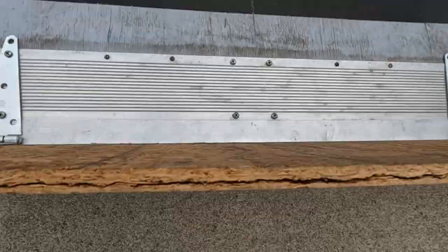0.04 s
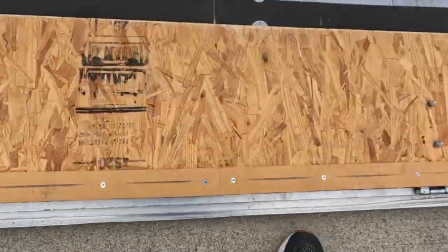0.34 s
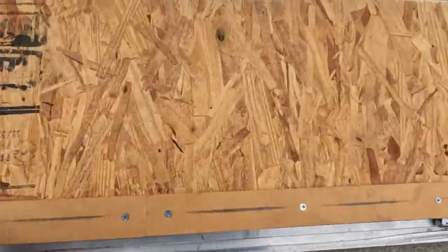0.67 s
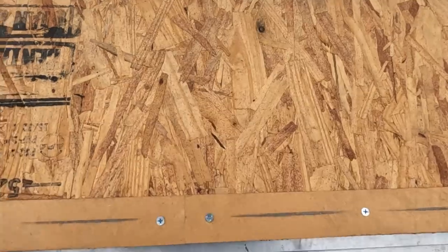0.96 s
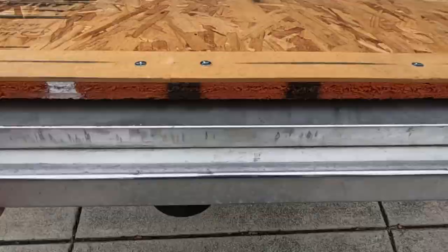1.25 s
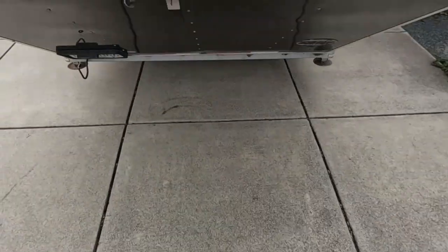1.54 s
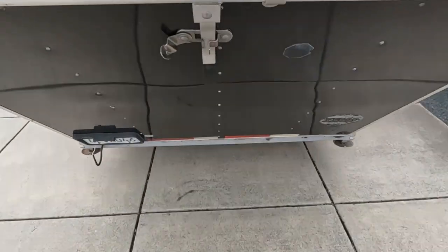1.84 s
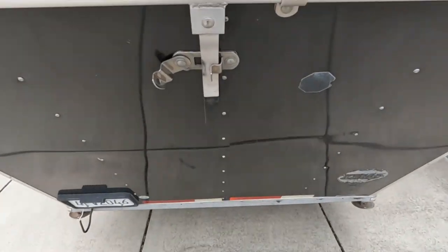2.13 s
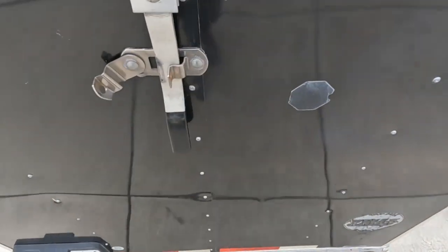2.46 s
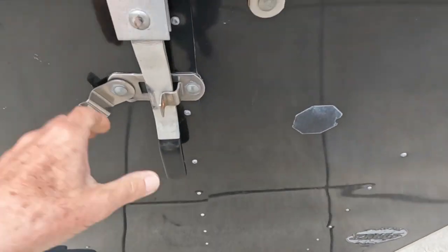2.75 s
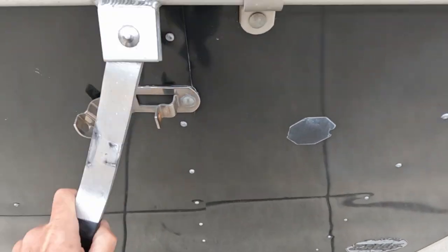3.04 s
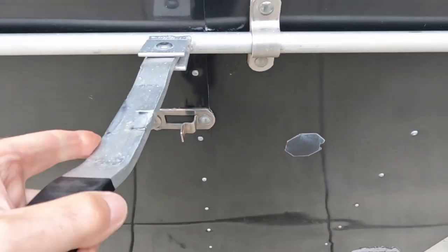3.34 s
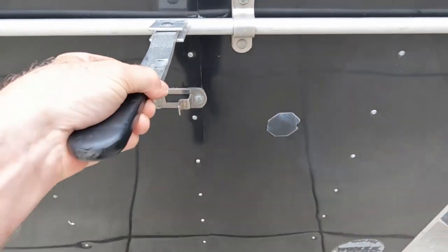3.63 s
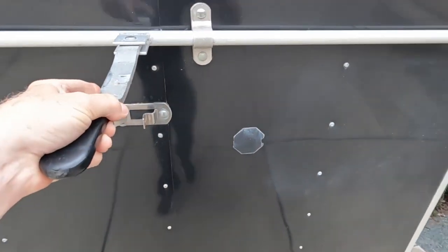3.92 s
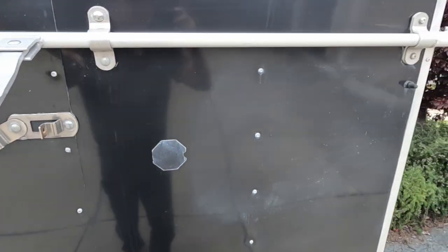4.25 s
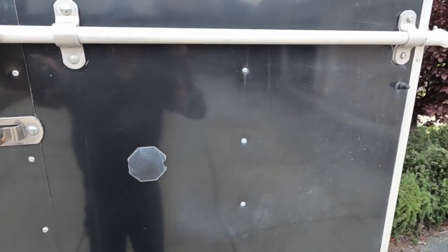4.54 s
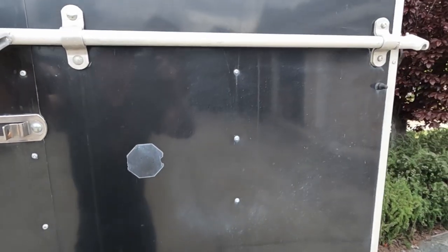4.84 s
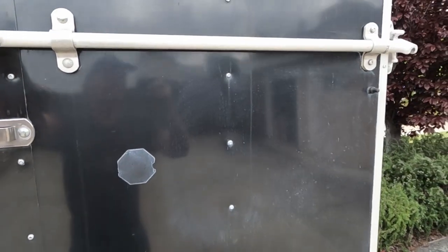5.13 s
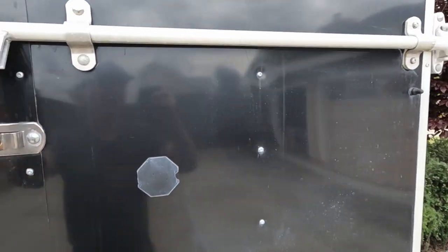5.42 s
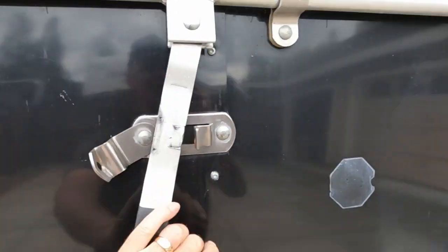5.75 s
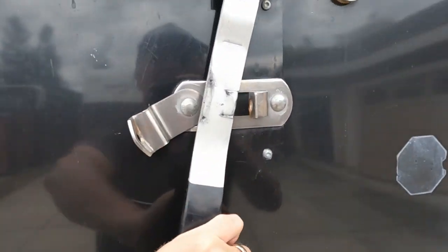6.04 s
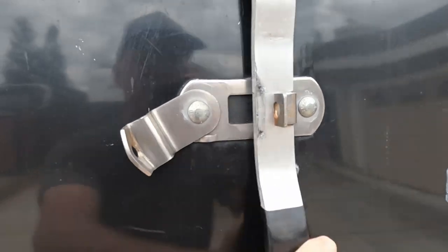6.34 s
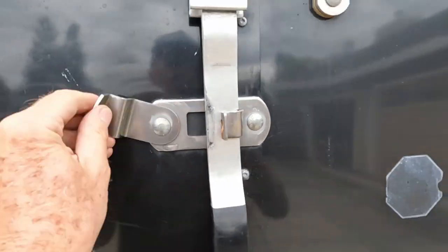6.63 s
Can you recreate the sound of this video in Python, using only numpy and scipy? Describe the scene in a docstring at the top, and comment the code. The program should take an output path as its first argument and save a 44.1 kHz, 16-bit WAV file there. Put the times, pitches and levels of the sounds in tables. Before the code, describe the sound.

A plywood flap slams over on a cargo trailer's ramp. The ramp is lifted with a gritty rattle and a whirring spring, then thuds against the frame. A steel handle scrapes and clanks out of its hasp, the locking bar knocks and groans briefly, and the latch closes with sharp clicks. It is heard up close outdoors, with a light breeze and a faint engine hum.

```python
"""The plywood ramp door of a cargo trailer is closed on a concrete driveway, heard from arm's length.
Over a light breeze and a far engine, its flap slams over (0.3 s). The ramp is heaved up (1.2 s) with a
rattle and a whirr of its spring, and booms on the frame (2.3 s). A steel handle grinds out of its hasp
(3.1 s), turns the locking bar, forces the groaning cams home (5.3 s) and is latched (6.3 s).
Shoes and fittings scuff along the way."""
import sys
import numpy as np
from scipy import signal
from scipy.fft import rfft, irfft, next_fast_len
from scipy.io import wavfile
from scipy.ndimage import uniform_filter1d

SR = 44100
rng = np.random.default_rng(int(sys.argv[2]) if len(sys.argv) > 2 else 0)


def unload_audio(sound):
    """Save the sound as a 16-bit wav file, at the path given as the first command line argument."""
    columns = np.transpose(np.atleast_2d(sound))
    # keep every value between -1 and 1, then stretch to whole-number steps
    steps = np.round(np.clip(columns, -1, 1) * 32767)
    wavfile.write(sys.argv[1], SR, steps.astype(np.int16))


N = 298998
TIME_S = np.arange(N) / SR
AGE_S = np.arange(SR // 2) / SR   # time since a blow

# Modes of the door. Each row: frequency in Hz, relative level in dB, t60 in seconds.
DOOR_MODES = [(85.4, -9.5, 0.18), (120, -1.5, 0.2), (154.9, -4, 0.25), (186.6, -3, 0.12), (224.4, -2, 0.13),
              (263.2, -1, 0.13), (302, -2, 0.12), (351.6, -6, 0.091), (426.6, -10.5, 0.12),
              (508, -11, 0.037), (624, -17, 0.084), (685, -21, 0.18), (913, -35, 0.19)]
# Spectra of grit and of dull, mid and bright steel contacts.
# Each row: frequency in Hz, relative density in dB.
GRIT_SPECTRUM = [(300, -1), (600, 14), (1200, 9.5), (2200, 7), (3500, 1), (5200, 0), (7000, -8.5),
                 (9000, -17), (13000, -22), (15000, -44)]
CLACK_SPECTRUM = [(400, -20), (900, -5), (1400, 0.5), (2400, -3.5), (3100, -4.5), (4500, -52)]
SNAP_SPECTRUM = [(2000, -23), (3200, 2), (4200, 4.5), (5600, 3), (7000, -16), (9000, -41)]
TICK_SPECTRUM = [(5000, -13.5), (7200, -3), (9200, -9.5), (11000, -14), (13200, -16.5), (15000, -29)]


def from_db(db):
    """Decibels to gain."""
    return 10 ** (np.asarray(db) / 20)


def rms_one(x):
    """Scales x to rms 1."""
    return x / np.sqrt(np.mean(x ** 2) + 1e-20)


def even(x, span_s):
    """Holds the short-term rms at 1."""
    return x / np.sqrt(np.abs(uniform_filter1d(x * x, int(span_s * SR))) + 1e-12)


def colour(x, spectrum):
    """Weights x with a spectrum of (Hz, dB) points."""
    hz, db = np.transpose(spectrum)
    size = next_fast_len(len(x))
    bins_hz = np.maximum(np.arange(size // 2 + 1) * SR / size, 1)
    gain = from_db(np.interp(np.log(bins_hz), np.log(hz), db))
    return irfft(rfft(x, size) * gain, size)[:len(x)]


def dull(x, edge_hz):
    """Low-pass: a soft contact excites little above its edge."""
    return signal.sosfilt(signal.butter(2, edge_hz, fs=SR, output="sos"), x)


def noise(spectrum, size=len(AGE_S)):
    """Coloured noise of rms 1."""
    return rms_one(colour(rng.standard_normal(size), spectrum))


def drift(rate_hz):
    """Random wander of rms 1."""
    return rms_one(np.interp(TIME_S * rate_hz, np.arange(N // 10), rng.standard_normal(N // 10)))


def grains(per_s, spread_db):
    """Tiny catches of rubbing surfaces, random in time and size."""
    catches = rng.random(N) < per_s / SR
    sizes = from_db(spread_db * np.clip(rng.standard_normal(N), -2, 2))
    return catches * sizes * rng.choice([-1, 1], N)


def fade(t60_s):
    """Decay of 60 dB in t60_s."""
    return np.exp(-np.log(1000) * AGE_S / t60_s)


def stroke(full_s, hold_s, rise_s, fall_s):
    """Effort builds, holds and dies away, 20 dB per rise or fall time."""
    decades = np.maximum(full_s - TIME_S, 0) / rise_s + np.maximum(TIME_S - full_s - hold_s, 0) / fall_s
    return 10 ** -np.minimum(decades, 10)


def swell(middle_s, half_s, steepness=4):
    """Rounded rise and fall."""
    return 1 / (1 + np.abs((TIME_S - middle_s) / half_s) ** steepness)


def ring(x, modes):
    """Parallel resonances of (Hz, dB, t60 s), neighbours in opposite phase."""
    out = 0
    for k, (hz, db, t60_s) in enumerate(modes):
        radius = np.exp(-np.log(1000) / (t60_s * SR))
        feedback = [1, -2 * radius * np.cos(2 * np.pi * hz / SR), radius ** 2]
        out += (-1) ** k * from_db(db) * signal.lfilter([.5, 0, -.5], feedback, x + 1e-18)
    return out


def add(track, start_s, sound):
    """Mixes a sound into a track."""
    start = max(round(start_s * SR), 0)
    track[start:start + len(sound)] += sound[:max(N - start, 0)]


def outdoors(air_db=-46, engine_hz=113, engine_db=-59, breeze_db=-46, gust_db=3):
    """Open air, the wavering hum of a far engine and a light breeze."""
    # Spectra. Each row: frequency in Hz, relative density in dB.
    air_spectrum = [(12, -33.5), (20, 7.5), (53, 3.5), (130, -8.5), (208, -15.5), (275, -18.5),
                    (504, -30.5), (828, -34.5), (1180, -28.5), (2110, -36.5), (4830, -48.5), (7730, -48),
                    (12700, -67), (14600, -80.5)]
    breeze_spectrum = [(10, -8), (30, -3), (60, -13), (100, -14.5), (200, -25.5), (600, -88.5)]
    pitch_hz = engine_hz * (1 + 0.02 * drift(rate_hz=8.9))
    engine = np.sin(2 * np.pi * np.cumsum(pitch_hz) / SR)
    breeze = noise(breeze_spectrum, N) * from_db(gust_db * drift(rate_hz=4.5))
    air = noise(air_spectrum, N)
    return from_db(air_db) * air + from_db(engine_db) * engine + from_db(breeze_db) * breeze


def scuffs(ring_db=-3, ring_t60_s=0.008, rasp_db=-4):
    """Soles and fittings slide briefly, rasping in one broad resonance."""
    # Each row: middle in seconds, level in dB, half-length in seconds, resonance in Hz,
    # grit in dB re that level.
    slides = [(0.293, -21, 0.0034, 2200, -4.5), (.516, -41.5, .0058, 2470, 3.5),
              (1.231, -37, .027, 2415, 5), (1.338, -46, 0.026, 5000, 6), (2.498, -30.5, .0045, 876, -21),
              (2.509, -28.5, 0.0064, 2600, -18), (3.075, -33.5, .0075, 2400, 7.5),
              (3.218, -25, 0.0095, 3520, -12.5), (4.516, -24.5, 0.0075, 2510, -23.5),
              (5.376, -56.5, 0.039, 3200, -13.5), (5.506, -35, .0046, 2640, -14.5),
              (5.742, -41, .0038, 509, -26), (6.351, -27.5, .0081, 477, -15),
              (6.529, -30.5, 0.0035, 2020, -14)]
    # Each row: frequency in Hz, relative density in dB.
    rasp_spectrum = [(400, -19), (900, 10.5), (1150, -10), (1550, 8.5), (2400, 4.5), (3300, -4),
                     (6000, -11), (9000, -50)]
    out, centre_s = np.zeros(N), AGE_S.mean()
    for middle_s, db, half_s, hz, grit_db in slides:
        resonance = ring(rng.standard_normal(len(AGE_S)), [(hz, 0, ring_t60_s)])
        rasp = from_db(ring_db) * rms_one(dull(resonance, edge_hz=6500))
        rasp += from_db(rasp_db) * noise(rasp_spectrum) + from_db(grit_db) * noise(GRIT_SPECTRUM)
        envelope = (1 + ((AGE_S - centre_s) / half_s) ** 4) ** -0.61
        add(out, middle_s - centre_s, from_db(db) * envelope * rasp)
    return out


def brackets(x, ring_db=-2, direct_db=-2):
    """Whatever touches the steelwork rings briefly in its high modes."""
    # Each row: frequency in Hz, t60 in seconds.
    modes = [(2190, 0.077), (2670, 0.1), (3240, 0.067), (3520, 0.044), (4080, 0.063), (4800, 0.032),
             (5550, 0.036), (6600, 0.033), (7400, 0.041)]
    peaks = [signal.iirpeak(hz, np.pi * hz * t60_s / np.log(1000), fs=SR) for hz, t60_s in modes]
    ringing = sum(signal.lfilter(b, a, x + 1e-18) for b, a in peaks)
    return from_db(direct_db) * x + from_db(ring_db) * ringing


def loose_fittings(grit, per_s=13, grit_cap_db=-63.5, rise_s=0.0029, t60_s=0.086):
    """Rivets and fittings tick unevenly while the door moves, following the grit up to a cap."""
    envelope = np.zeros(N)
    pulse = (1 - np.exp(-AGE_S / rise_s)) * fade(t60_s)
    for k, (offset, size) in enumerate(rng.random((int(per_s * N / SR), 2))):
        start_s = (k + offset) / per_s
        drive = min(np.interp(start_s, TIME_S, grit), from_db(grit_cap_db))
        add(envelope, start_s, drive * from_db(3.5 + 2 * size) * pulse)
    bands = ((CLACK_SPECTRUM, 1), (SNAP_SPECTRUM, 0), (TICK_SPECTRUM, -3))
    return envelope * sum(from_db(db) * noise(spectrum, N) for spectrum, db in bands)


def singing(trim_db=-2, flutter_db=5):
    """Flap, panel, spring and bar: each move feeds a narrow resonance that swells and flutters."""
    # Each row: middle and half-length in seconds, frequency and width in Hz, relative level in dB.
    resonances = [(0.219, .035, 52, 15, -31.5), (.22, 0.038, 650, 157, -48.5),
                  (1.27, 0.11, 490, 110, -34.5), (1.22, 0.03, 3500, 160, -54),
                  (1.333, 0.05, 4690, 170, -52), (2.13, 0.37, 132, 16, -35), (2.13, 0.17, 1200, 220, -46.5),
                  (2.102, 0.0085, 1185, 130, -25), (2.257, .11, 1343, 320, -44),
                  (2.496, .02, 1460, 210, -43), (3.14, 0.057, 614, 54, -35), (3.221, 0.017, 904, 25, -21),
                  (3.219, 0.014, 7390, 700, -46), (3.7, 0.091, 1425, 180, -50),
                  (3.799, 0.0076, 1405, 140, -31), (4.169, 0.048, 1430, 230, -44),
                  (5.411, 0.059, 596, 293, -38.5), (6.298, 0.14, 280.7, 70, -41)]
    out = np.zeros(N)
    for middle_s, half_s, hz, width_hz, db in resonances:
        phase = 2 * np.pi * hz * TIME_S
        band = drift(width_hz) * np.cos(phase) + drift(width_hz) * np.sin(phase)
        gain = from_db(db + trim_db + flutter_db * drift(rate_hz=55))
        out += swell(middle_s, half_s, steepness=5.8) * gain * even(band, span_s=0.048)
    return out


def friction(whirr_trim_db=-2.5, grit_trim_db=3.5, judder_db=4):
    """Moving joints catch and slip, shaking panel and steelwork and shedding a gritty hiss."""
    # Moves of flap, ramp, handle, bar and hasp. Each row: time of full effort, hold, rise and fall
    # in seconds, then relative levels of panel shudder, steel whirr and grit in dB.
    moves = [(.12, .03, 0.067, 0.064, -51, -55.5, -59.5), (0.262, 0.16, 0.14, 0.12, -35.5, -49, -65),
             (.68, 0.017, 0.085, .2, -59, -89, -71), (1.19, 0.055, .12, .1, -19.5, -35, -44),
             (1.317, 0.057, 0.094, .2, -19.5, -32.5, -41.5), (1.62, 0.43, 0.28, 0.17, -40, -57.5, -66),
             (2.169, 0.343, 0.28, 0.036, -34.5, -41.5, -65), (2.713, .02, .1, .12, -50, -62.5, -69),
             (3.046, 0.044, 0.12, 0.041, -38.5, -54, -48.5), (3.09, 0.11, 0.072, 0.098, -24.5, -49, -43),
             (3.63, 0.2, .07, 0.3, -31, -47.5, -64), (4.036, .17, .2, 0.68, -42, -58, -69),
             (4.727, 0.37, .2, 0.28, -57, -67, -100.5), (5.3, 0.13, .02, 0.27, -26.5, -48, -56.5),
             (5.56, 0.01, .06, 0.15, -42.5, -69, -47), (5.93, 0.066, .1, 0.1106, -41, -62, -61.5),
             (6.176, 0.32, .12, .15, -41, -63, -63), (6.74, 0.05, .1, .1, -55.5, -49, -43)]
    # Spring and bar. Each row: frequency in Hz, relative level in dB, t60 in seconds.
    steel_modes = [(695, -12, 0.052), (1004, 1.5, 0.016), (1197, -4.5, 0.047), (1373, 1, 0.014),
                   (1670, -7.5, 0.0092)]
    power = sum((from_db(move[4:])[:, None] * stroke(*move[:4])) ** 2 for move in moves)
    shudder, whirr, grit = np.sqrt(power)
    judder = from_db(judder_db * drift(rate_hz=90))
    damped_modes = [(hz, db, 0.57 * t60_s) for hz, db, t60_s in DOOR_MODES]
    panel = ring(grains(per_s=700, spread_db=5.5), damped_modes)
    panel = shudder * even(dull(panel, edge_hz=760), span_s=0.06)
    steel = ring(grains(per_s=980, spread_db=2), steel_modes)
    steel = from_db(whirr_trim_db) * whirr * even(dull(steel, edge_hz=3700), span_s=0.035)
    hiss = colour(grains(per_s=2500, spread_db=2), GRIT_SPECTRUM)
    hiss = from_db(grit_trim_db) * grit * rms_one(brackets(hiss, ring_db=3, direct_db=-1.5))
    return panel + judder * (steel + hiss) + brackets(loose_fittings(grit))


def handle(level_db=-27):
    """Dragged over the hasp, the flat handle rings in its bending modes."""
    # Each row: frequency in Hz, relative level in dB, t60 in seconds.
    modes = [(373.4, 3, 0.057), (485, -4, 0.048), (611, -6.5, 0.24), (660, -3.5, 0.15), (887, -6, 0.039),
             (1330, -9, 0.11), (1470, -14, 0.086)]
    ringing = dull(ring(grains(per_s=830, spread_db=4), modes), edge_hz=2200)
    effort = stroke(full_s=3.09, hold_s=0.15, rise_s=0.011, fall_s=0.03)
    return from_db(level_db) * effort * even(ringing, span_s=0.076)


def groans(jitter=0.035, trim_db=2, rough_db=2.5):
    """The loaded bar sticks and slips in its brackets: a gliding tone, richest at peak effort."""
    # Each row: middle and half-length in seconds, slip rate in Hz, glide in Hz per second,
    # relative level in dB, overtone gain in dB.
    slip_trains = [(4.093, 0.023, 520, 300, -44, -25), (5.442, .027, 270, 449, -14.5, -24),
                   (5.558, .022, 428, -150, -21.5, -1.5)]
    # Each row: multiple of the slip rate, relative level in dB.
    harmonics = [(2, -10.5), (3, -7.5), (4, -15.5), (5, -29), (6, -24)]
    out = np.zeros(N)
    for middle_s, half_s, hz, glide_hz_per_s, db, bite_db in slip_trains:
        effort = swell(middle_s, half_s)
        pitch_hz = hz + glide_hz_per_s * np.clip(TIME_S - middle_s, -2 * half_s, 2 * half_s)
        phase = 2 * np.pi * np.cumsum(pitch_hz * (1 + jitter * drift(rate_hz=170))) / SR
        overtones = sum(from_db(harmonic_db + rough_db * drift(rate_hz=520)) * np.sin(k * phase)
                        for k, harmonic_db in harmonics)
        out += effort * from_db(db + trim_db) * (np.sin(phase) + effort * from_db(bite_db) * overtones)
    return out


def clicks(firm_db=-21.5, firm_contact_s=0.00015, tail_db=-27, tail_t60_s=0.2):
    """Steel meets steel: a crack of dense, damped modes and a faint tail from the frame."""
    # Each row: start in seconds, relative level in dB, brightness in dB, t60 in seconds.
    contacts = [(0.2963, -21, -13.5, .02), (0.346, -46, -17, .072), (.6623, -64, -20, 0.058),
                (.693, -62, -7.5, .09), (1.14, -48, -8.5, .039), (1.512, -28.5, 0, 0.015),
                (1.6615, -47, -15, .062), (1.7773, -59.5, 0, 0.15), (1.956, -61, -2, 0.053),
                (2.038, -60, 5.5, 0.041), (2.0947, -50.5, -24.5, .043), (2.151, -52, -4.5, .06),
                (2.3208, -41, 0.5, 0.027), (2.4136, -57.5, 1, .038), (2.7291, -59, -4, .15),
                (3.005, -56.5, -10, .15), (3.0668, -45, 0, .05), (3.275, -30.5, -20, .029),
                (3.5548, -56, 2.5, .05), (3.602, -52, 2, 0.038), (3.9255, -63.5, -2, 0.075),
                (3.975, -63.5, -0.5, .06), (4.0856, -53, -7.5, .035), (4.2013, -60, -6.5, 0.12),
                (4.503, -39.5, -13.5, 0.033), (4.6488, -62, -9.5, .15), (5.2729, -37, -21, .057),
                (5.693, -53, -20.5, .065), (5.7057, -52.5, -15, .1), (5.9173, -54.5, 1.5, .046),
                (6.123, -56.5, -2.5, .072), (6.282, -57, 5, .036), (6.3422, -32.5, -5, .028),
                (6.3571, -27, 2, .023), (6.6425, -26.5, 0, .028), (6.6757, -50, -27, .074),
                (6.7146, -57, -11, .075)]
    out = np.zeros(N)
    for start_s, db, bright_db, t60_s in contacts:
        bands = ((CLACK_SPECTRUM, 5 - 0.39 * bright_db), (SNAP_SPECTRUM, 4),
                 (TICK_SPECTRUM, 3 + bright_db))
        crack = sum(from_db(db + band_db) * noise(spectrum) for spectrum, band_db in bands)
        contact_s = firm_contact_s * from_db(0.33 * (firm_db - db))   # light touches start softly
        attack = 1 - np.exp(-AGE_S / contact_s)
        add(out, start_s, crack * attack * (fade(t60_s) + from_db(tail_db) * fade(tail_t60_s)))
    return out


def pings():
    """Struck hinges, hasp and handle ring in single modes."""
    # Each row: start in seconds, frequency in Hz, level in dB, t60 in seconds.
    tones = [(.298, 452, -8, .035), (0.294, 1350, -10, 0.022), (.297, 2210, -21.5, 0.022),
             (.298, 3950, -23, .03), (1.513, 5610, -21, 0.026), (2.096, 997, -18, 0.06),
             (2.293, 1028, -17, 0.042), (3.067, 6530, -31, 0.13), (3.067, 9120, -33, 0.094),
             (3.067, 10200, -40.5, 0.083), (3.067, 11900, -38, 0.076), (3.276, 2239, -45.5, 0.24),
             (3.274, 3182, -35, 0.06), (6.346, 485, -14.5, 0.085), (6.394, 296, -23, 0.14),
             (6.358, 6440, -15.5, 0.018)]
    out = np.zeros(N)
    for start_s, hz, db, t60_s in tones:
        add(out, start_s, from_db(db) * np.sin(2 * np.pi * hz * AGE_S) * fade(t60_s))
    return out


def struck_door(boom_hz, focus_db_per_octave=4.5):
    """A blow wakes the door's modes, less so below its own boom."""
    out = 0
    for hz, db, t60_s in DOOR_MODES:
        octaves_below = max(np.log2(boom_hz / hz), 0)
        gain = from_db(db - focus_db_per_octave * octaves_below + rng.normal(0, 1.3))
        out += gain * np.sin(2 * np.pi * (hz * AGE_S + rng.random())) * fade(t60_s)
    return out


def knocks(heave_hz=52, firm_db=-8.5, firm_contact_s=0.0014):
    """A blow bends the panel, wakes its modes, rattles the frame and rocks the trailer."""
    # Each row: start in seconds; boom's relative level in dB, frequency in Hz and t60 in seconds;
    # relative levels of trailer heave and frame clang in dB.
    blows = [(.296, -14.5, 187, 0.11, -25, -20.5), (.346, -22, 201.7, .11, -31, -25.5),
             (0.659, -47, 326, 0.049, -57, -54), (1.003, -39, 196, 0.16, -47.5, -52.5),
             (1.084, -26, 187, .16, -37.5, -39), (1.135, -26, 167, 0.43, -34, -32),
             (1.225, -31, 90, .2, -22, -39), (1.51, -32, 185, 0.37, -26, -28),
             (2.094, -25.5, 141, 0.12, -41, -35.5), (2.135, -40, 301, 0.099, -35.5, -34.5),
             (2.29, -22, 118, .22, -30.5, -33), (2.354, -24, 123.7, 0.2, -28, -53),
             (3.004, -26.5, 436, 0.057, -52, -35.5), (3.086, -12.5, 256.5, 0.11, -45, -20),
             (3.112, -16.5, 295, 0.087, -47.5, -23.5), (3.199, -19, 259, .17, -45.5, -25),
             (3.214, -21, 275, 0.16, -45, -16.5), (3.277, -26, 234, 0.076, -54.5, -35.5),
             (3.794, -23, 271, 0.14, -43, -25.5), (3.865, -31, 131.6, 0.2, -35.5, -50),
             (4.355, -41, 127, 0.073, -38.5, -51), (4.662, -49, 121.5, .13, -37, -58),
             (5.068, -39, 263.3, .12, -48.5, -60), (5.274, -15.5, 269.3, .14, -17, -22),
             (5.359, -33, 260, 0.13, -27.5, -33), (5.62, -31, 265, .1, -42, -50),
             (5.695, -30, 276.5, 0.17, -41, -34), (5.739, -22, 175, 0.052, -31, -32),
             (6.342, -12.5, 197, 0.043, -38, -19), (6.367, -27, 120.8, 0.087, -25.5, -46),
             (6.392, -35.5, 135, .09, -24.5, -54), (6.638, -23.5, 283, .045, -53.5, -32.5),
             (6.735, -31.5, 278, 0.06, -51, -47)]
    # Each row: frequency in Hz, relative density in dB.
    clang_spectrum = [(300, -4.5), (480, 9), (650, 5), (780, -2.5), (930, -0.5), (1300, -5.5),
                      (1800, -12.5), (3500, -53.5)]
    out = np.zeros(N)
    heave_phase = 2 * np.pi * heave_hz * AGE_S
    for start_s, boom_db, boom_hz, t60_s, heave_db, clang_db in blows:
        contact_s = firm_contact_s * from_db(0.071 * (firm_db - boom_db))   # gentle blows press longer
        attack = 1 - np.exp(-AGE_S / contact_s)
        heave = (np.sin(heave_phase) + np.sin(heave_phase * rng.uniform(1.2, 1.6))) * fade(t60_s=0.33)
        bend = -np.sin(2 * np.pi * boom_hz * AGE_S) * fade(t60_s)
        boom = from_db(7) * bend + from_db(-3) * struck_door(boom_hz)
        clang = noise(clang_spectrum) * (fade(t60_s=0.072) + from_db(-14) * fade(t60_s=0.22))
        blow = from_db(boom_db) * boom + from_db(heave_db + 2) * heave + from_db(clang_db + 2) * clang
        add(out, start_s, attack * blow)
    return out


def widen(mid, scatter_t60_s=0.1, scatter_db=-5, quadrature_db=-4):
    """Left and right differ in phase and in faint reflections off door and ground."""
    # Each row: frequency in Hz, gain of the side signal in dB.
    side_spectrum = [(40, -10), (130, -25.5), (300, -15.5), (700, -10.5), (1500, -5.5), (3000, -3),
                     (10000, -6.5)]
    scatter = rng.standard_normal(len(AGE_S)) * fade(scatter_t60_s)
    reflected = signal.fftconvolve(mid, scatter / np.linalg.norm(scatter))[:N]
    quadrature = signal.hilbert(mid, next_fast_len(N)).imag[:N]
    side = colour(from_db(quadrature_db) * quadrature + from_db(scatter_db) * reflected, side_spectrum)
    return np.array([mid + side, mid - side])


def scene():
    """The door, straight ahead, in the open air."""
    door = friction() + knocks() + brackets(clicks() + pings() + scuffs())
    return widen(door + handle() + singing() + groans() + outdoors())


def record(dry, cutoff_hz=14000):
    """Rounds the loudest peaks and cuts the top."""
    rounded = 0.89 * np.tanh(dry / 0.94)
    return signal.sosfilt(signal.cheby1(10, 0.2, cutoff_hz, fs=SR, output="sos"), rounded)


dry = scene()
out = record(dry)
unload_audio(out)
```